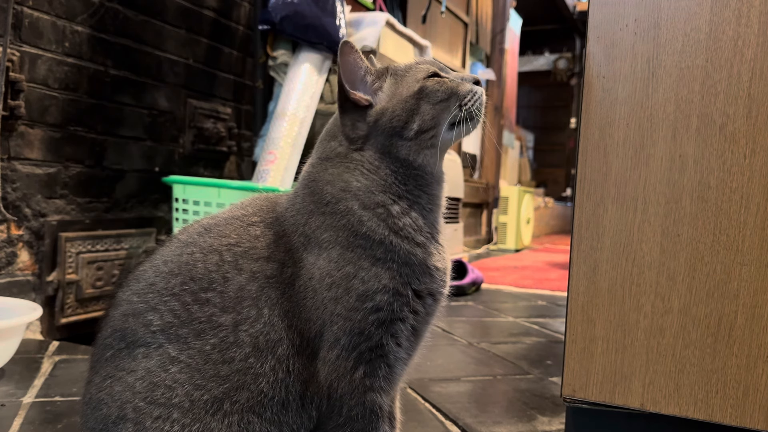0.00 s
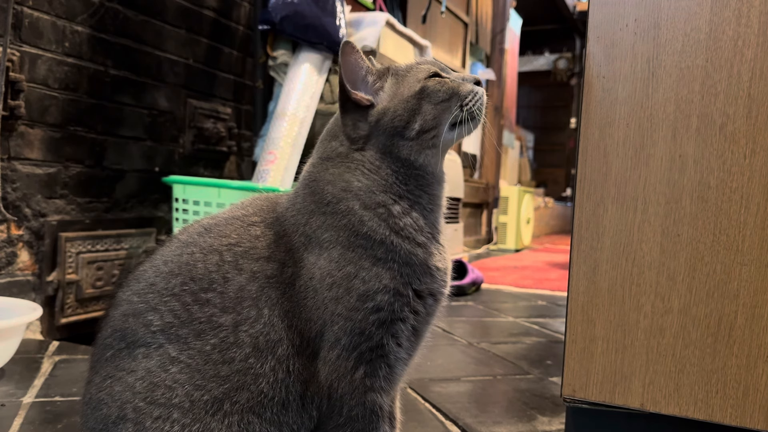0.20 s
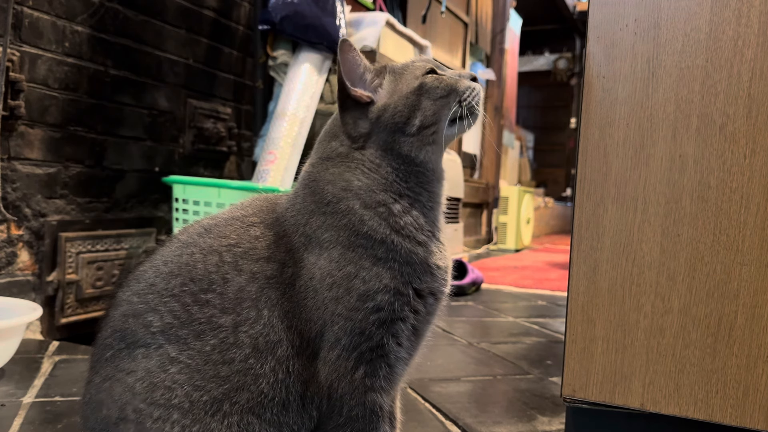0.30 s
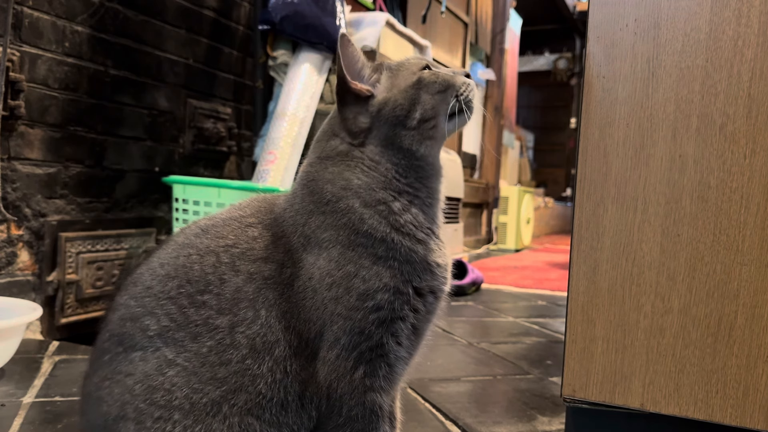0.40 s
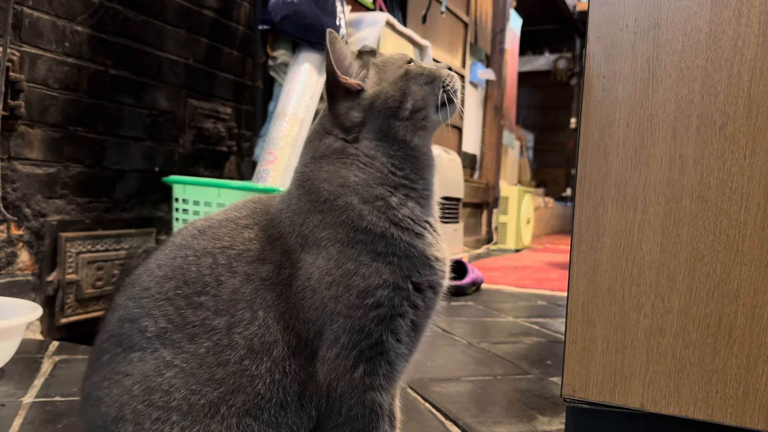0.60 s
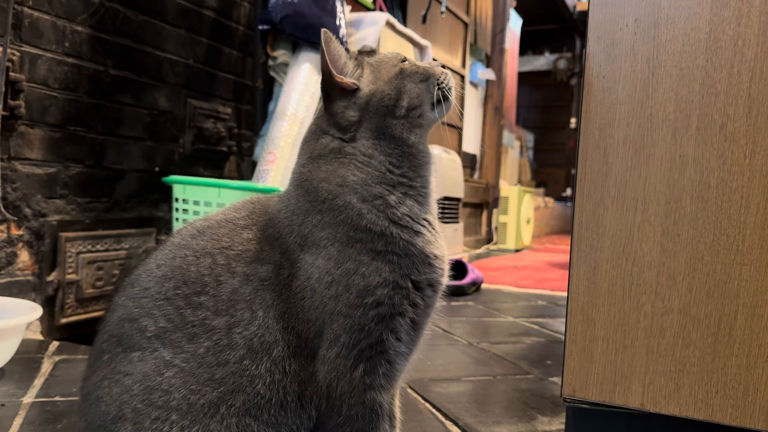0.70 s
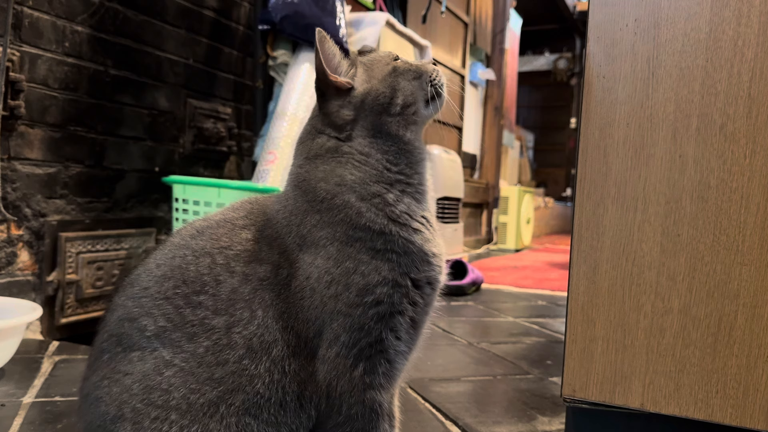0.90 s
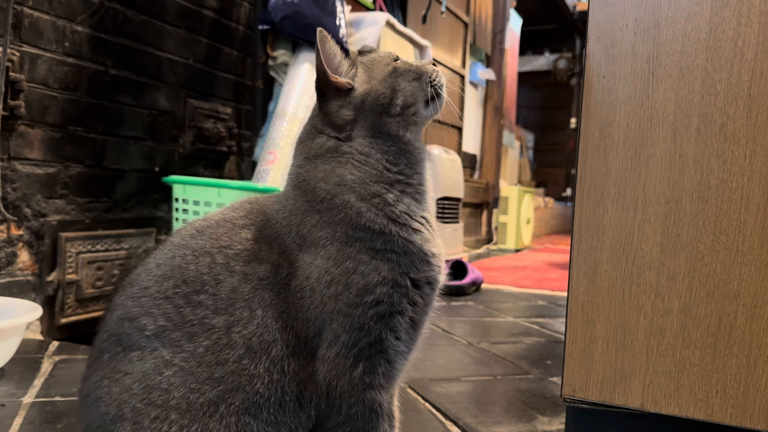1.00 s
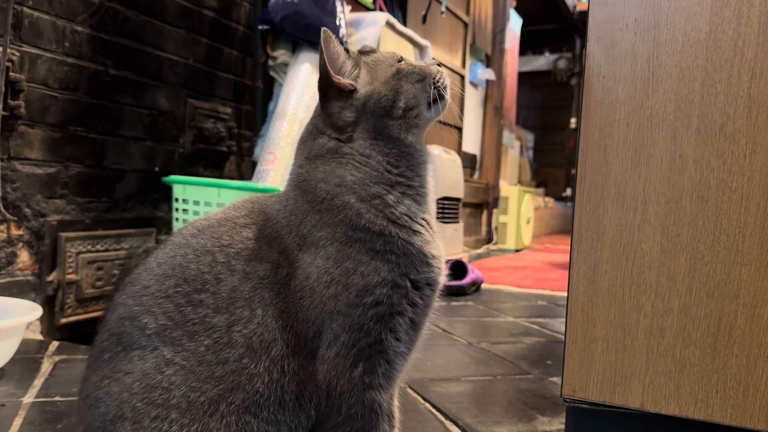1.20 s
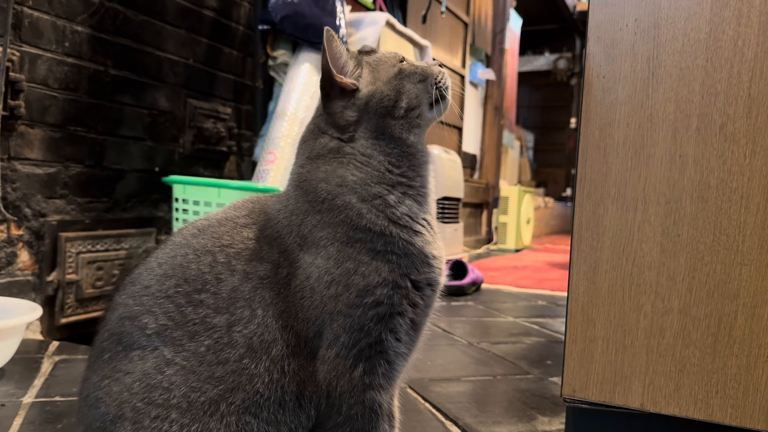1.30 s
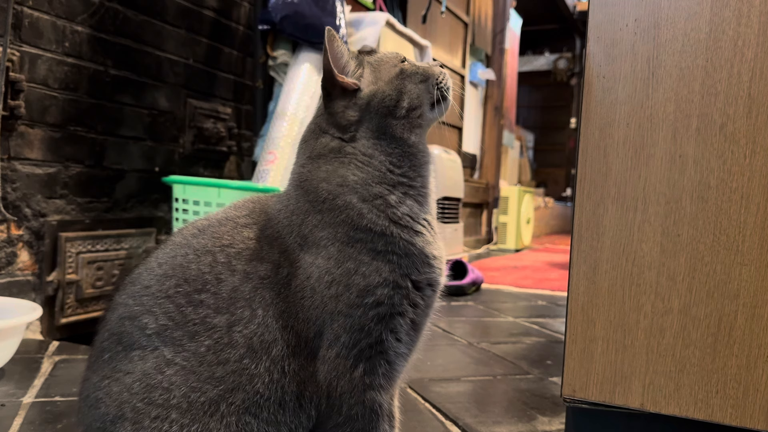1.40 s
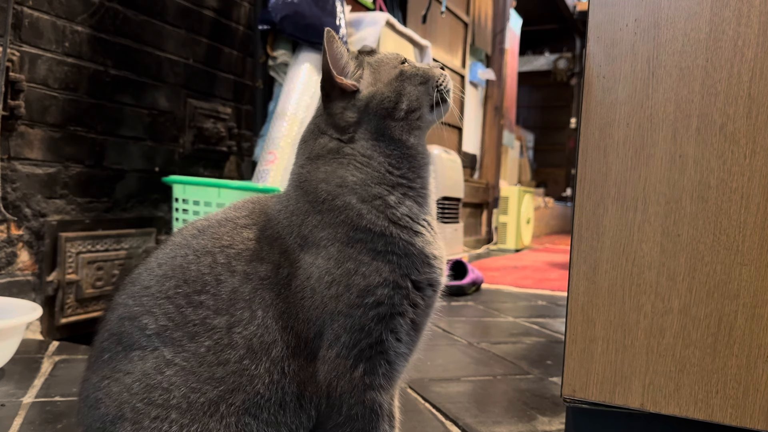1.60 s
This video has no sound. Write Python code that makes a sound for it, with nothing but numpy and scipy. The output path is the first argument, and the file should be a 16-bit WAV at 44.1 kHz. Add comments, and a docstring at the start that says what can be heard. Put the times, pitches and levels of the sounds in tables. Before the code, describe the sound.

Plastic packet crinkling in a quiet, lively home kitchen, heard from floor level. Faint room tone opens; a strong dull knock with low boom lands at 0.2 seconds, softer ones near 0.5, 0.8 and 1.1, with a slight rustle at 0.55. From about 1.25 to 1.45 the packet crunches densely with snaps, thins to scattered crackles, then snaps sharply near 1.67.

```python
"""Dull knocks land on a home kitchen floor, heard from floor level: clusters of small contacts, coloured
and reverberated, while the weight of landings swells decaying low modes of boards and room.
A plastic packet rustles up into a dense crinkle of random clicks, with single snaps: short folds and cracks.
A faint high chirr of narrow noise bands comes and goes over a quiet room tone of steady shaped noise."""
import sys
import numpy as np
from scipy import signal
from scipy.fft import rfft, irfft, next_fast_len
from scipy.io import wavfile
from scipy.ndimage import map_coordinates

SR = 44100
rng = np.random.default_rng(int(sys.argv[2]) if len(sys.argv) > 2 else 0)


def unload_audio(sound):
    """Save the sound as a 16-bit wav file, at the path given as the first command line argument."""
    columns = np.transpose(np.atleast_2d(sound))
    # keep every value between -1 and 1, then stretch to whole-number steps
    steps = np.round(np.clip(columns, -1, 1) * 32767)
    wavfile.write(sys.argv[1], SR, steps.astype(np.int16))


N = 74970
T = np.arange(N) / SR


def amp(db):
    """Decibel law: level in dB to amplitude ratio."""
    return 10 ** (np.asarray(db) / 20)


def unit(x):
    """Normalisation to a root-mean-square value of 1."""
    return x / np.sqrt(np.mean(x ** 2) + 1e-20)


def along(points, hz):
    """Interpolation of a spectral curve on a logarithmic frequency axis."""
    f, v = np.transpose(points)
    return np.interp(np.log(hz + 1), np.log(f + 1), v)


def level(rows):
    """Envelope: a level in dB interpolated linearly over time."""
    return np.interp(T, *np.transpose(rows))


def filtered(x, response):
    """Linear filtering: the spectrum of x times a complex frequency response."""
    m = next_fast_len(x.shape[-1] + SR // 4)
    hz = np.fft.rfftfreq(m, 1 / SR)
    return irfft(rfft(x, m) * response(hz), m)[..., :x.shape[-1]]


def coloured(x, db_of):
    """Minimum-phase filtering: a causal response of unit energy is found from its magnitude."""
    hz = np.fft.rfftfreq(4096, 1 / SR)
    cepstrum = irfft(np.log(amp(db_of(hz)) + 1e-6))
    # folding the cepstrum onto positive times makes the response causal
    cepstrum[1:2048] *= 2
    cepstrum[2049:] = 0
    h = irfft(np.exp(rfft(cepstrum)))[:2048]
    return signal.fftconvolve(x, h / np.linalg.norm(h))[:len(x)]


def add(out, x, s):
    """Superposition: mixes x into out from time s in seconds."""
    seg = out[:, round(s * SR):][:, :x.shape[1]]
    seg += x[:, :seg.shape[1]]


# Reverberation time of the room: frequency_hz, t60_s
ROOM_T60 = [(300, 0.78), (1000, 0.57), (3000, 0.55), (8000, 0.95), (15000, 0.12)]
EARLY_DB, EARLY_S = 10.5, 0.29  # near walls: extra level at first, and the t60 of its additional fall
BUILD_S = .004  # time constant of the room's build-up


def room(x, wet_db):
    """Reverberation: direct sound plus two fresh noise tails, each frequency decaying at its own rate."""
    hz, t, z = signal.stft(rng.standard_normal((2, SR // 2)), SR, nperseg=256)
    decay = amp(-60 * t / along(ROOM_T60, hz)[:, None])
    early = 1 + amp(EARLY_DB - 60 * t / EARLY_S)
    tail = signal.istft(z * decay * early, SR, nperseg=256)[1]
    tail = tail * (1 - np.exp(-T[:tail.shape[1]] / BUILD_S))
    tail = amp(wet_db) * tail / np.linalg.norm(tail[0])
    tail[:, 0] = 1  # the direct sound
    return signal.fftconvolve(x[None], tail, axes=1)


# Resonances of the corner between cupboards and floor: frequency_hz, width_hz, gain_db
CORNER_MODES = [(167.4, 15.7, 8.5), (297.7, 24, 4), (584, 216, -5.5), (974, 133, 1), (1422, 110, -5),
                (1613, 45, -1.5), (2255, 185, -6), (3240, 3000, -31.5)]


def corner(f):
    """Modal superposition: a sum of band-pass resonances with alternating sign."""
    total = 0
    for k, (centre, width, db) in enumerate(CORNER_MODES):
        damping = 1j * f * width
        total = total + (-1) ** k * amp(db) * damping / (centre * centre - f * f + damping)
    return total


# Spectrum of the room tone: frequency_hz, density_db (relative, per Hz)
TONE_SPECTRUM = [(20, -17), (70, 8.5), (200, -0.5), (300, 1.5), (360, -5.5), (1380, -9), (3050, -21),
                 (6700, -18), (15800, -42.5)]
TONE_DB = -69.5


def room_tone():
    """Stationary noise: white noise shaped by a fixed spectrum gives the quiet tone of the house."""
    noise = rng.standard_normal((2, N))
    return amp(TONE_DB) * unit(filtered(noise, lambda hz: amp(along(TONE_SPECTRUM, hz))))


# Swells of the chirr: centre_s, length_s, pitch_hz, level_db
CHIRR_SWELLS = [(.09, .03, 6750, -81), (.71, .04, 6800, -84), (.93, .035, 6500, -81), (.1, .03, 5100, -86)]
CHIRR_WIDTH_HZ = 200


def chirr():
    """Narrow-band noise: Gaussian bands swell and fade under Gaussian envelopes."""
    out = np.zeros((2, N))
    for s, length, pitch, db in CHIRR_SWELLS:
        noise = rng.standard_normal((2, N))
        band = unit(filtered(noise, lambda f: np.exp(-((f - pitch) / CHIRR_WIDTH_HZ) ** 2)))
        out += amp(db) * np.exp(-((T - s) / length) ** 2) * band
    return out


GRAIN_SPREAD_DB = 9
CLUMPS_PER_S, CLUMP_DB = 90, 2  # rate and depth of the random level of the clicks


def grains(per_s):
    """Shot noise: dense random clicks of uneven size, grouped by a slower random level."""
    count = int(per_s * N / SR)
    size = amp(GRAIN_SPREAD_DB * rng.uniform(-0.95, 1, count)) * rng.choice([-1, 1], count)
    clicks = np.bincount(rng.integers(0, N, count), size, N)
    clump_points = rng.standard_normal(int(CLUMPS_PER_S * N / SR) + 4)
    clumps = map_coordinates(clump_points, [T * CLUMPS_PER_S])  # smooth interpolation
    return unit(amp(CLUMP_DB * clumps) * clicks)


# Envelope of the bright film crackle: time_s, level_db
FILM_LEVEL = [(.4, -91), (.5, -73.5), (.55, -57), (.62, -86), (.68, -108), (.96, -91), (.99, -69),
              (1.09, -72), (1.13, -60.5), (1.29, -55), (1.315, -48.5), (1.4, -57), (1.46, -61.5),
              (1.52, -91), (1.6, -65.5), (1.66, -69), (1.7, -60.5)]
# Spectrum of the film: frequency_hz, density_db (relative, per Hz)
FILM_SPECTRUM = [(200, -23.5), (500, -4), (1700, -4), (4000, -11), (6500, -10.5), (8700, -10),
                 (11000, -16.5), (15800, -13.5)]
# Envelope of the packet's squeezed body: time_s, level_db
CRUSH_LEVEL = [(.97, -107), (1.02, -69.5), (1.1, -77.5), (1.2, -68.5), (1.31, -56), (1.33, -48.5),
               (1.4, -46.5), (1.46, -59.5), (1.5, -76), (1.62, -71.5), (1.7, -62)]
GRAINS_PER_S, CREASES_PER_S = 2300, 1300
RUSTLE_WET_DB = -0.5


def rustle():
    """Crackling noise: clicks of the film, and of the squeezed body through the corner's resonances."""
    film = coloured(grains(GRAINS_PER_S), lambda hz: along(FILM_SPECTRUM, hz))
    body = unit(filtered(grains(CREASES_PER_S), corner))
    packet = amp(level(FILM_LEVEL)) * film + amp(level(CRUSH_LEVEL)) * body
    out = np.zeros((2, N))
    size = SR // 6
    for start in range(0, N, size):  # fresh reverberation for each stretch
        add(out, room(packet[start:start + size], RUSTLE_WET_DB), start / SR)
    return out * amp(-RUSTLE_WET_DB)


# Single snaps of the packet: start_s, fold_pitch_hz, fold_level_db, crack_level_db
SNAP_EVENTS = [(1.271, 1710, -42, -62), (1.306, 976, -36.5, -38.5), (1.305, 1660, -40, -62),
               (1.324, 2230, -48, -49), (1.455, 2330, -59, -41.5), (1.554, 930, -48.5, -59),
               (1.588, 1570, -55, -49), (1.599, 896, -49.5, -64), (1.6705, 1620, -36.5, -36.5),
               (1.671, 897, -44.5, -65)]
SNAP_CYCLES = 2.9  # the fold peaks after half this many cycles
SNAP_S, CRACK_HZ = .004, 8500  # time for the crack to fall 20 dB, and its band centre
SNAP_WET_DB = -6


def snaps():
    """Impulsive release: each crease pops as a few cycles of the fold and a decaying bright crack."""
    out = np.zeros((2, N))
    t = np.arange(2048) / SR
    for s, pitch, fold_db, crack_db in SNAP_EVENTS:
        u = t * pitch * 2 / SNAP_CYCLES
        swell = np.e * u * np.exp(-u)  # rises to 1, then decays
        fold = np.sin(2 * np.pi * pitch * t) * swell
        noise = rng.standard_normal(len(t))
        noise = filtered(noise, lambda f: 1 / (1 + ((f - CRACK_HZ) / 8000) ** 4))
        crack = unit(noise) * amp(-20 * t / SNAP_S)
        add(out, room(amp(fold_db) * fold + amp(crack_db) * crack, SNAP_WET_DB), s)
    return out


# Low modes of floor and room: pitch_hz, t60_s, swell_s (time constant)
BOOM_MODES = [(68.1, 0.28, 0.0054), (111.6, 0.47, 0.0068), (172.85, 0.27, 0.0035), (293.55, 0.24, 0.0056)]
# Weight landing on the floor: start_s, then level_db of each of the four modes
LANDINGS = [(.224, -35.5, -32.5, -28.5, -28.5), (0.273, -48, -31, -47, -37.5),
            (0.358, -45.5, -50, -55.5, -48), (0.533, -45, -41.5, -47.5, -33), (.565, -37.5, -42, -40, -44),
            (0.818, -43.5, -49.5, -42, -43), (0.861, -59, -57, -48, -85), (1.105, -80, -57, -53.5, -53),
            (1.124, -52, -86, -33.5, -39), (1.156, -46.5, -52.5, -47.5, -71),
            (1.34, -48.5, -51, -49, -39.5), (1.385, -36.5, -54, -45, -43), (1.45, -52, -67, -44.5, -76),
            (1.58, -58.5, -86, -51.5, -55)]
BOOM_SPLIT = 0.06  # fractional pitch gap within each pair of modes
BOOM_HAZE_DB, BOOM_HAZE_T60 = -7.5, 0.38  # low noise ringing on with the modes; t60 in s


def booms():
    """Modal excitation: each landing swells close pairs of decaying low modes with a haze of noise."""
    out = np.zeros((2, N))
    t = np.arange(SR // 2) / SR
    for s, *modes_db in LANDINGS:
        for (pitch, t60, swell), mode_db in zip(BOOM_MODES, modes_db):
            ring = np.sin(2 * np.pi * pitch * t)
            ring += 0.2 * np.sin(2 * np.pi * pitch * (1 + BOOM_SPLIT) * t)
            noise = rng.standard_normal((2, len(t)))
            haze = unit(filtered(noise, lambda f: 1 / (1 + ((f - pitch) / (0.47 * pitch)) ** 4)))
            both = amp(-60 * t / t60) * ring + amp(BOOM_HAZE_DB - 60 * t / BOOM_HAZE_T60) * haze
            add(out, amp(mode_db) * (1 - np.exp(-t / swell)) * both, s)
    return out


# Spectrum of a contact: frequency_hz, density_db (relative, per Hz)
CONTACT_SPECTRUM = [(200, -38), (400, -9), (720, -9), (1100, -6.5), (2500, -12), (6000, -20.5), (9000, -30),
                    (15800, -39.5)]
# Each knock: start_s, energy_db of the whole knock, treble_tilt_db_per_octave,
# length_s of its scatter of contacts
KNOCK_EVENTS = [(0.2229, 1.5, -1, .015), (0.532, -7, -4, 0.016), (0.791, -10, -6, .03),
                (1.121, -11.5, -8.5, 0.016)]
CONTACTS, LEAD_DB = 40, 20.5  # small contacts in a landing, and the first one's level over them
KNOCK_RING_DB, KNOCK_WET_DB = 13, 8  # how far the corner stands out; level of the room's tail


def knocks():
    """Impact: a strong first contact and a scatter of small ones excite the corner and the room."""
    out = np.zeros((2, N))
    for s, energy_db, tilt_db, length in KNOCK_EVENTS:
        when = length * SR * rng.random(CONTACTS) ** 2  # crowded towards the start
        contacts = np.bincount(when.astype(int), rng.choice([-1, 1], CONTACTS), 8192)
        contacts[0] = amp(LEAD_DB)
        slap = coloured(contacts, lambda hz: along(CONTACT_SPECTRUM, hz) + tilt_db * np.log2(hz / 1000 + 1))
        slap = filtered(slap, lambda hz: 1 + amp(KNOCK_RING_DB) * corner(hz))
        heard = room(slap, KNOCK_WET_DB)
        add(out, amp(energy_db) * heard / np.linalg.norm(heard), s)
    return out


# Left-right likeness: frequency_hz, correlation (-1 to 1)
PORT_LIKENESS = [(60, .96), (150, .93), (300, .65), (600, 0), (1400, .1), (2800, .4), (5000, -.1),
                 (7000, -.6), (9000, -.95), (11500, -.3), (14000, .5)]
# Balance of the two ports: frequency_hz, left_over_right_db
PORT_BALANCE = [(100, -1), (330, 3), (700, -1), (2800, 3), (5500, 7), (9000, 3), (15000, -2.5)]


def ports(pair):
    """Interchannel coherence: two signals are blended into the left and right microphone ports."""
    def blend(hz):
        turn = np.arccos(np.clip(along(PORT_LIKENESS, hz), -1, 1)) / 2
        return np.array([np.cos(turn), 1j * np.sin(turn)])

    mid, side = filtered(pair, blend)
    left_right = np.array([mid + side, mid - side])
    return filtered(left_right, lambda hz: amp(np.outer([.5, -.5], along(PORT_BALANCE, hz))))


def scene():
    """Superposition of all sources at the two ports."""
    background = room_tone() + chirr()
    packet = rustle() + snaps()
    return ports(background + packet + booms() + knocks())


TOP_HZ, BASS_CUT_HZ = 15850, 22


def record(dry):
    """Band limiting: a second-order high-pass loses the deepest bass; nothing above TOP_HZ is kept."""
    return filtered(dry, lambda hz: (hz < TOP_HZ) * (1j * hz / (BASS_CUT_HZ + 1j * hz)) ** 2)


dry = scene()
out = record(dry)
unload_audio(out)
```